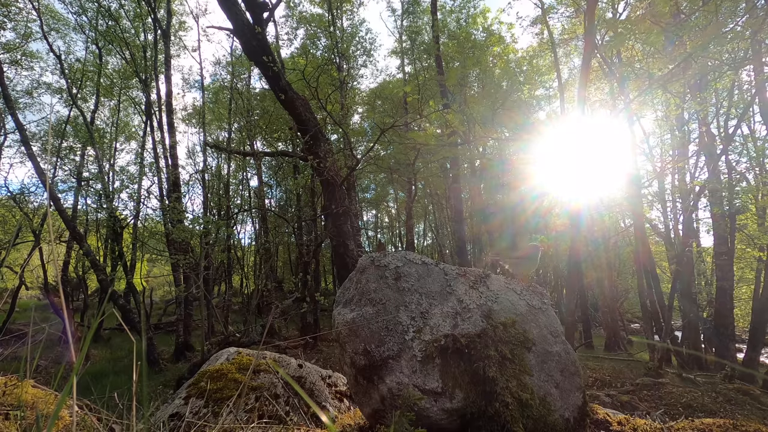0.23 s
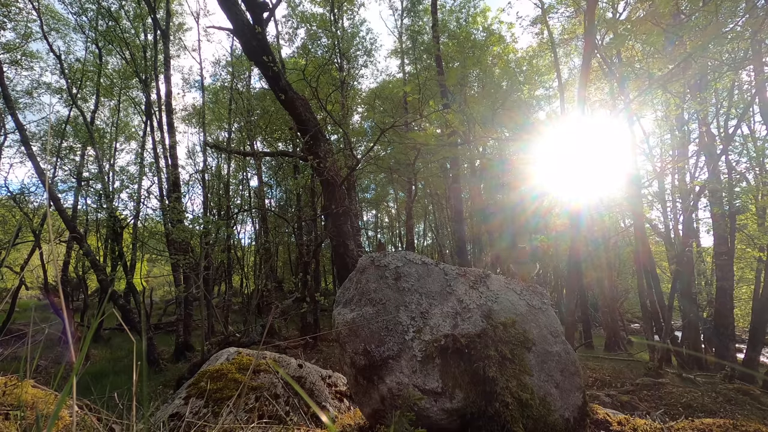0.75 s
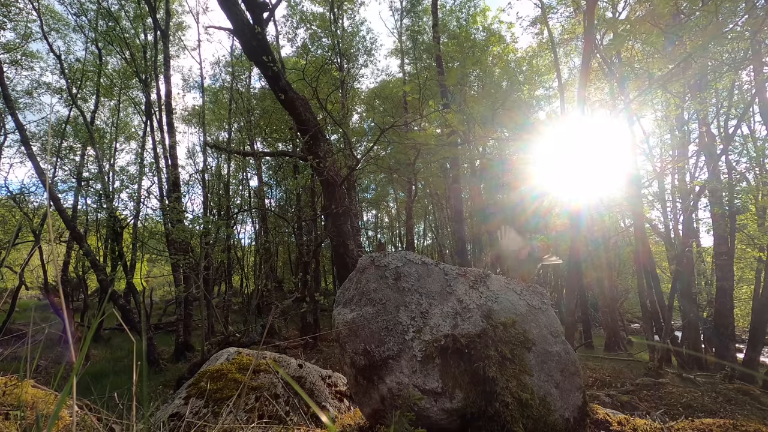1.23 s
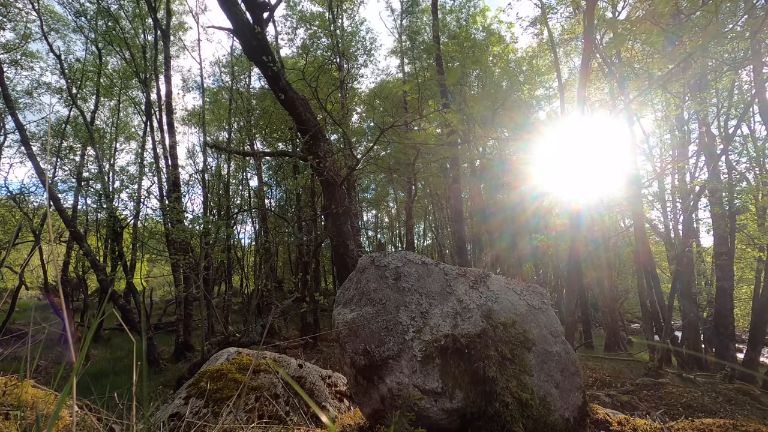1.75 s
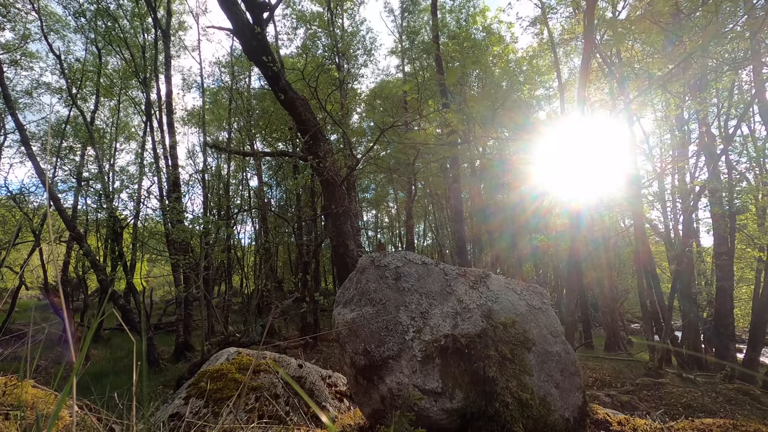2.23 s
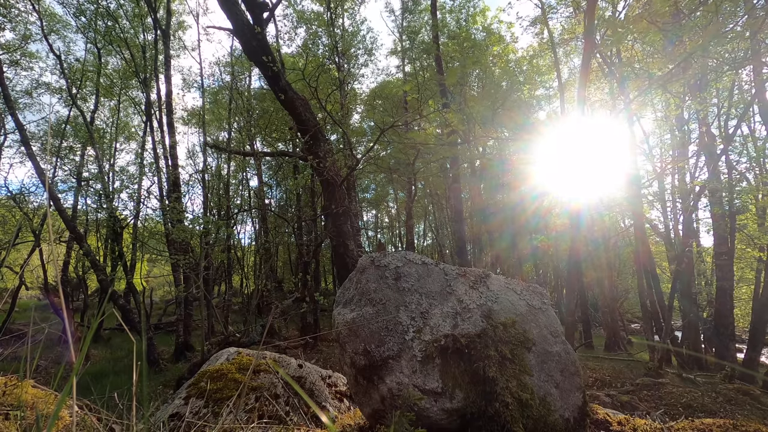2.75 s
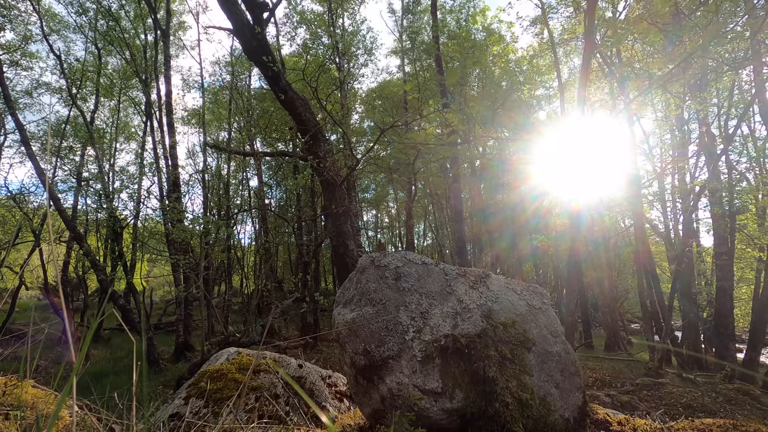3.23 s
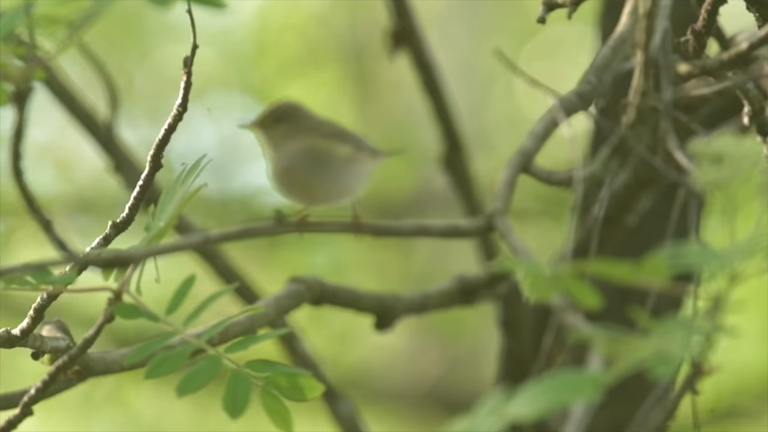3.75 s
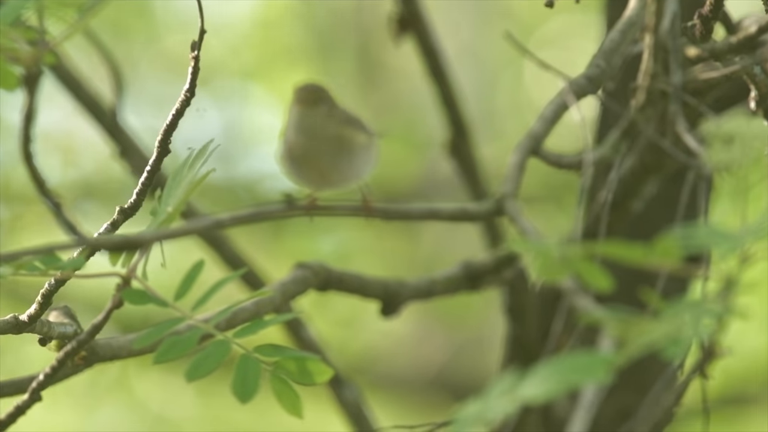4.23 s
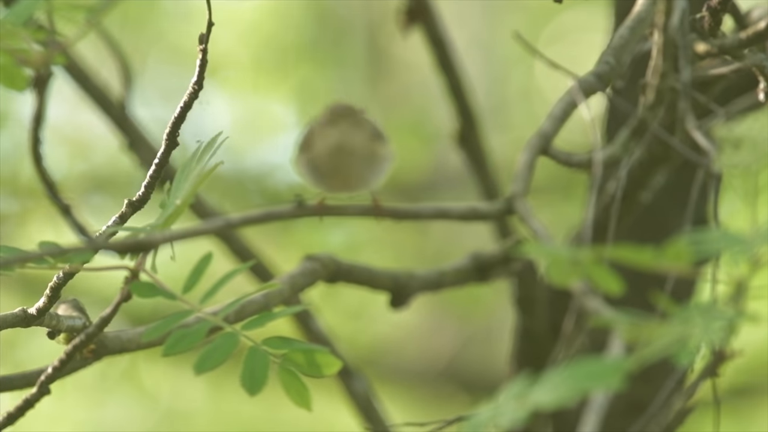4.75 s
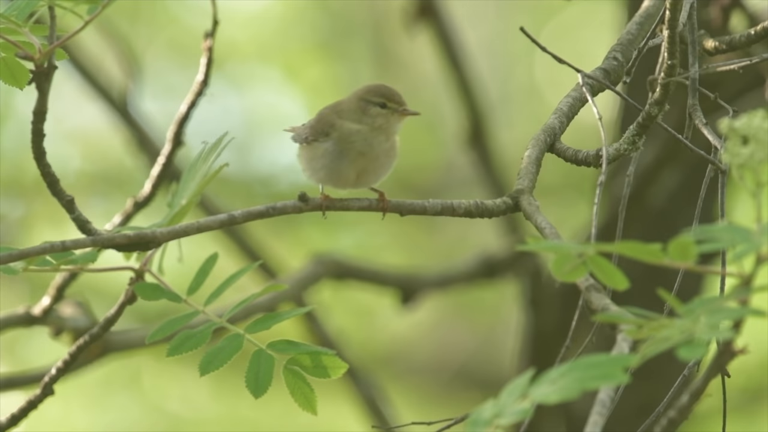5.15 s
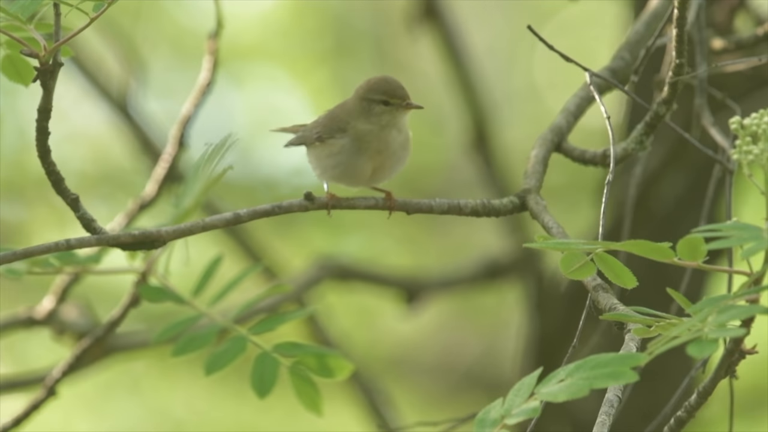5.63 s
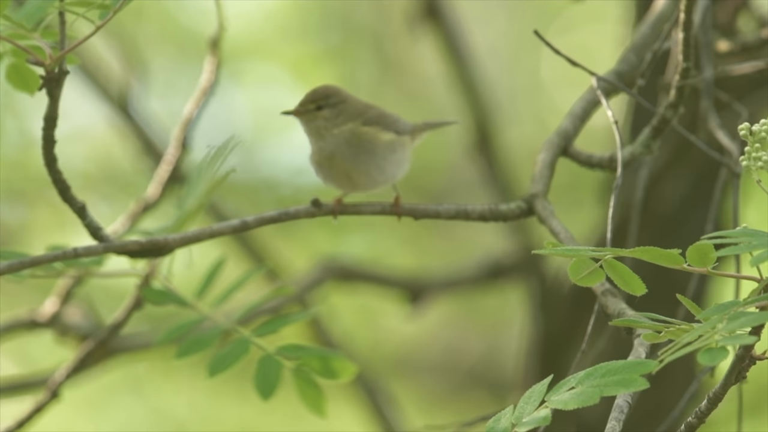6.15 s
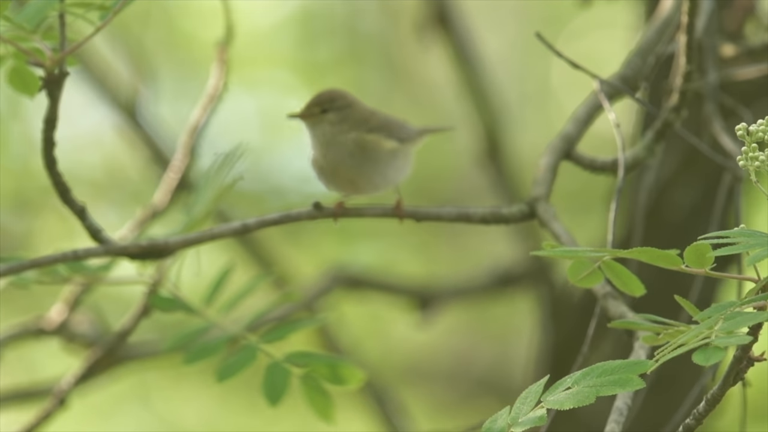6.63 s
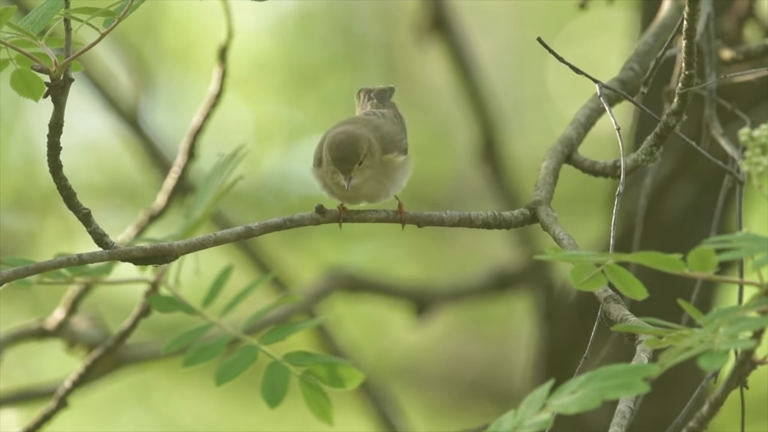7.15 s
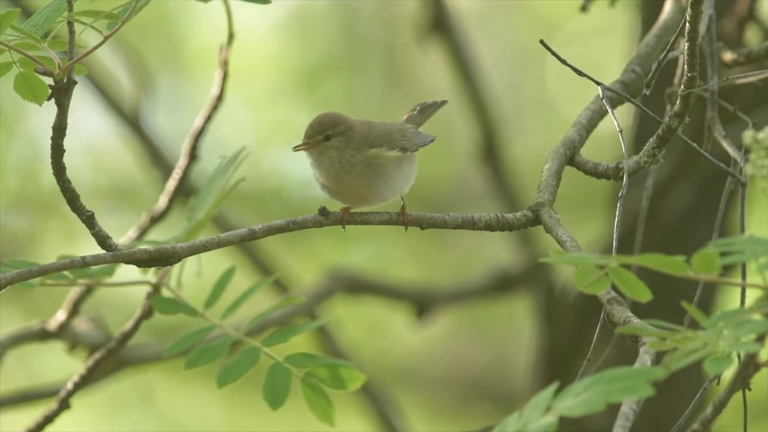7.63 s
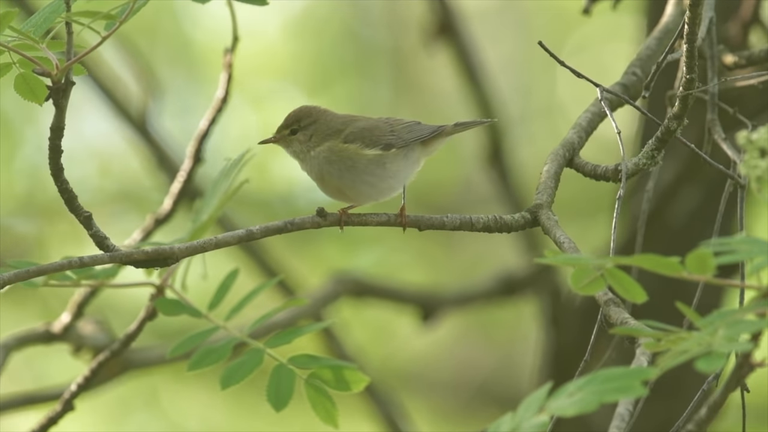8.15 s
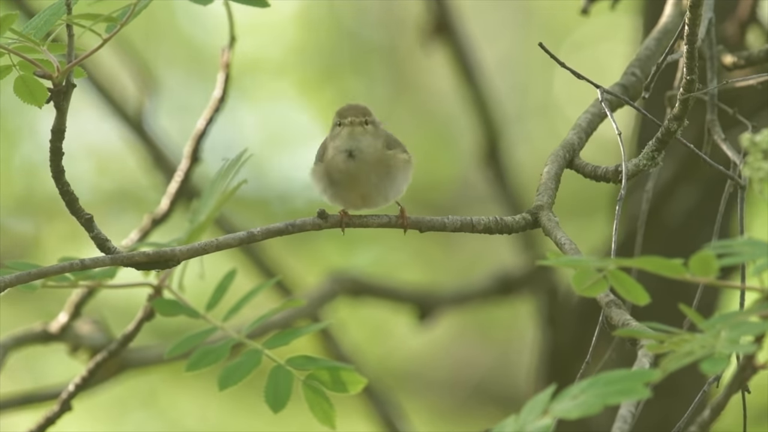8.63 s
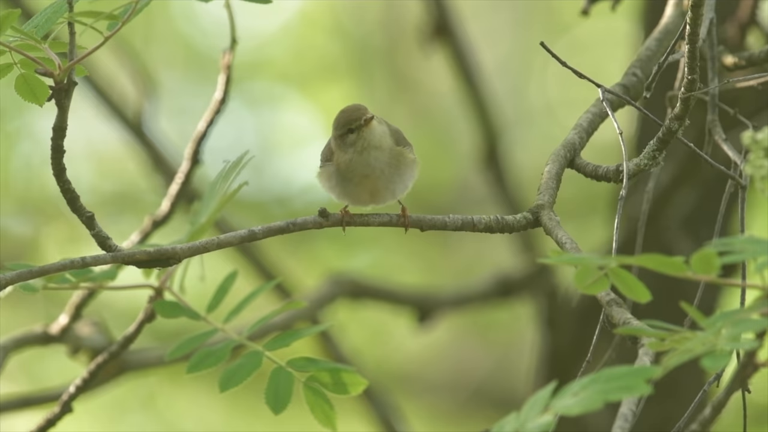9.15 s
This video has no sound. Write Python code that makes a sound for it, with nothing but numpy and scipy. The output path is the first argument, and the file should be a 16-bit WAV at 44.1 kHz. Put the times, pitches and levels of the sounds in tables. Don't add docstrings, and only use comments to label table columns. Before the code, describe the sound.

Quiet open woodland with birds at several distances. Close, nearly central whistles open the scene, overlapped by two rough, faint crow caws on the left. High chips and echoing whistles fill the middle, followed by a left-hand trill that slows and sinks, then a distant phrase of quick peaks. The close songbird resumes with repeated bright notes getting stronger. A low, steady wash and barely felt deep thumps lie beneath.

```python
import sys
import numpy as np
from scipy import signal
from scipy.fft import irfft
from scipy.io import wavfile
from scipy.ndimage import uniform_filter1d

SR = 44100
rng = np.random.default_rng(int(sys.argv[2]) if len(sys.argv) > 2 else 0)


def waveform_to_disk(signal):
    frames = np.transpose(np.atleast_2d(signal))
    scaled = np.clip(frames, -1, 1) * 32767
    samples = np.round(scaled).astype(np.int16)
    wavfile.write(sys.argv[1], SR, samples)


def level_to_linear(level):
    exponent = np.asarray(level, float) / 20
    return 10 ** exponent


N = 413658


def evened(x):
    return x / np.sqrt(np.mean(x ** 2) + 1e-20)


def read(points, hz):
    f, value = np.transpose(points)
    return np.interp(np.log(hz + 1), np.log(f + 1), value)


def add(mix, s, sound):
    part = mix[round(s * SR):][:len(sound)]
    part += sound[:len(part)]


def wobble(count, size):
    return evened(uniform_filter1d(rng.standard_normal(count), size=size))


def columns(rows):
    s, *values = np.transpose(rows)
    t = np.arange(s[0], s[-1], 1 / SR)
    return [uniform_filter1d(np.interp(t, s, v), size=176, mode="nearest") for v in values]


def noise(spectrum, level_db, same, lean_db):
    hz = np.fft.rfftfreq(N, 1 / SR)
    a, b, c, d = rng.standard_normal((len(hz), 4)).T
    same = np.clip(read(same, hz), -1, 1)
    lean = level_to_linear(read(lean_db, hz) / 2)
    left, other = a + 1j * b, c + 1j * d
    right = same * left + np.sqrt(1 - same ** 2) * other
    z = np.array([left * lean, right / lean])
    return level_to_linear(level_db) * evened(irfft(z * level_to_linear(read(spectrum, hz)), N))


# (frequency [Hz], level [dB per Hz])
WASH_SPECTRUM = [(26, -21), (45, -4), (70, -10.5), (101, -4.5), (160, -10.5), (226, -14.5), (397, -22),
                 (1000, -14.5), (1850, -19), (2670, -22.5), (2950, -23), (3860, -27), (5170, -27.5),
                 (15500, -39.5)]
# (frequency [Hz], likeness [-1 to 1])
WASH_LIKENESS = [(60, 0.77), (130, 0.3), (290, 0.407), (640, 0.48), (1410, 0.852), (3100, 0.603),
                 (6820, 0.536), (15000, 0.015)]
# (frequency [Hz], left minus right [dB])
WASH_LEAN = [(60, 2), (130, -4), (290, 0), (640, -4), (1410, -4.5), (3100, -2), (6820, -1.5), (15000, 0)]


def distant_wash():
    return noise(WASH_SPECTRUM, -49.5, WASH_LIKENESS, WASH_LEAN)


# (frequency [Hz], level [dB per Hz])
RUMBLE_SPECTRUM = [(2, -40), (6, 21), (10, 25), (20, 13.5), (35, -1.5), (60, -49)]


def air_rumble():
    return noise(RUMBLE_SPECTRUM, -49, [(5, 1.0), (60, 0.22)], [(5, 0), (60, 0)])


def far_machine():
    first_s, period_s, half_s = 0.182, 0.22751, 0.015
    out = np.zeros(N)
    puff = signal.windows.hann(round(2 * half_s * SR))
    times = np.arange(first_s, N / SR, period_s)
    for s, (size, late) in zip(times, rng.standard_normal((len(times), 2))):
        add(out, s - half_s + 0.00043 * late, level_to_linear(0.37 * size) * puff)
    bass_limit = signal.butter(2, 11, "high", fs=SR, output="sos")
    return level_to_linear(-33.0) * signal.sosfilt(bass_limit, out)


# (frequency [Hz], fall by 60 dB [s])
WOOD_DECAY = [(1400, 0.85), (3000, 0.3), (5000, 0.65), (8000, 0.97)]


def scatter(start_s, near_db, near_t60):
    taps = np.zeros((2, SR))
    at = np.arange(40, SR - 20, 20) + rng.integers(0, 20, (2, (SR - 41) // 20))
    np.put_along_axis(taps, at, rng.choice([-1., 1.], at.shape), 1)
    hz, t, z = signal.stft(taps, SR, nperseg=256)
    far_tail = level_to_linear(-60 * t / read(WOOD_DECAY, hz)[:, None])
    near_cluster = level_to_linear(near_db - 60 * t / near_t60)
    onset = np.clip(t / start_s, 0, 1)
    tail = signal.istft(z * (far_tail + near_cluster) * onset, SR, nperseg=256)[1]
    return tail / np.linalg.norm(tail[0])


def placed(x, pan_db, direct_db, wet_db, near_db=8):
    echoes = scatter(start_s=0.0028, near_db=near_db, near_t60=0.107)
    wet = signal.fftconvolve(x[None], echoes, axes=1)[:, :N]
    sides = level_to_linear(np.array([[pan_db], [-pan_db]]) / 2)
    return sides * (level_to_linear(direct_db) * x + level_to_linear(wet_db) * wet)


def resonate(x, hz, width):
    turn = np.exp(2j * np.pi * np.cumsum(hz) / SR)
    r = np.exp(-np.pi * width / SR)
    return 2 * (turn * signal.lfilter([1 - r], [1, -r], x / turn)).real


def caw_rows(s, length, level_db, throat_hz):
    attack_s, release_s, ends_db, pulses_per_s = 0.016, 0.054, -10, 60
    end = s + length
    corners = [(s, ends_db), (s + attack_s, 0), (end - release_s, 0), (end, ends_db)]
    return [(t, level_db + db, throat_hz, pulses_per_s) for t, db in corners]


# (time [s], length [s], level [dB], throat [Hz])
CROW_CAWS = [
    (0.331, .29, -55.5, 1464),
    (1.158, .39, -51.5, 1439),
]


def crow():
    out = np.zeros(N)
    for caw in CROW_CAWS:
        rows = caw_rows(*caw)
        level_db, throat_hz, rate = columns(rows)
        rate = rate * (1 + 0.0774 * wobble(len(rate), 800))
        pulses = np.diff(np.floor(np.cumsum(rate) / SR), prepend=0)
        rasp = 0.94 * rng.standard_normal(len(rate))
        ring = resonate(resonate(evened(pulses) + rasp, throat_hz, 150), throat_hz, 250)
        add(out, rows[0][0], level_to_linear(level_db) * evened(ring) * signal.windows.tukey(len(rate), .15))
    return placed(out, pan_db=10.0, direct_db=-2.5, wet_db=-1.5)


def bird(notes, waver, edge_s, flutter_db):
    out = np.zeros(N)
    for rows in notes:
        hz, level_db = columns(rows)
        hz = hz * (1 + waver * wobble(len(hz), 130))
        shape = signal.windows.tukey(len(hz), min(2 * edge_s * SR / len(hz), 1))
        whistle = np.sin(2 * np.pi * np.cumsum(hz) / SR)
        add(out, rows[0][0], np.sqrt(2) * level_to_linear(level_db) * shape * whistle)
    flutter = evened(uniform_filter1d(wobble(N, 130), size=130))
    return out * level_to_linear(flutter_db * flutter)


# (time after its start [s], pitch [Hz], level [dB])
TRILL_SYLLABLE = [
    [(0, 4754, 0), (.01, 4200, -2.5), (.025, 4000, 2), (.035, 3304, -1.5), (.05, 2780, 3)],
    [(.06, 3900, -8), (.075, 4689, 4.5), (.085, 4760, -14)],
]


def trill_notes():
    k = np.arange(13)
    starts = 4.2 + .121 * k + .0007 * k ** 2
    factors = .9 + .33 * np.exp(-k / 6)
    levels_db = -56.5 - 12 * np.exp(-k / 1.43)
    return [[(s + u, hz * factor, db + level_db) for u, hz, db in stroke]
            for s, factor, level_db in zip(starts, factors, levels_db)
            for stroke in TRILL_SYLLABLE]


def trilling_bird():
    song = bird(trill_notes(), waver=0.0156, edge_s=0.0027, flutter_db=2.5)
    return placed(song, pan_db=11.0, direct_db=-4.5, wet_db=-3.5)


# (share of the length [0-1], way from first to second pitch [0-1], level [dB])
WAVE = [(0, 0.04, -6.5), (.06, .42, 2), (.2, .06, 3), (.33, 0.02, -3), (.48, .16, -2), (.62, .45, 3.5),
        (.8, 1, -1), (.89, 1, -4), (1, 0.35, 6.5)]
HOOK = [(0, 0, -4), (.165, .42, 0.5), (.35, 1, -11.5), (.6, .7, -6), (1, .06, -6.5)]
HOLD_DROP = [(0, 0.0084, -8), (.36, -.01, -5.5), (.73, 0, 2), (.83, .35, -2), (1, 0.98, -13)]
PEAK = [(0, .27, -7), (.17, .36, -2), (.35, .43, -6.5), (.475, 0.93, -21.5), (.59, .52, -8), (.67, .24, -4),
        (.84, .06, -8), (1, 0, -10)]
STEP = [(0, 0.042, -8), (.26, .08, -6), (.42, 0.27, -8), (.55, .92, -6.5), (.7, 1, -1.5), (1, 0.95, -18)]
FAR_PEAK = [(0, .42, 0), (.16, .46, 3.5), (.38, 1, -5), (.58, .16, -7), (.72, 0.077, 0), (1, 0, -6.5)]
FAR_STEP = [(0, 0.046, -7), (.3, .07, -1), (.46, 0.97, -2.5), (.6, .95, -6), (1, 0.68, 2)]
SETTLE = [(0, 0.029, -5), (.16, .62, -4), (.38, .92, 0), (.65, .98, -5.5), (1, 1, -9.5)]
SWEEP = [(0, 0.093, -2.5), (.19, .46, 0.5), (.68, .71, -1.5), (1, 0.936, 2)]
DROP = [(0, 0.13, -4.5), (.6, .49, -16), (1, 1, -0.5)]
GLIDE = [(0, 0.053, 1), (.5, .5, -4), (1, 1, -0.5)]


def sung(song):
    return [[(s + u * length, first_hz + way * (second_hz - first_hz), db + level_db)
             for u, way, db in shape]
            for shape, notes in song
            for s, length, first_hz, second_hz, level_db in notes]


# (time
# [s], length [s], first pitch [Hz], second pitch [Hz], level [dB])
FAINT_SONG = [(GLIDE, [(1.565, .025, 3660, 4010, -64.5), (1.665, .045, 6070, 5360, -63),
              (2.0, .06, 7670, 7470, -72), (2.17, 0.11, 7250, 6800, -65), (2.27, 0.062, 6300, 5896, -66),
              (2.84, 0.075, 5580, 5210, -57.5), (2.841, .069, 6470, 6286, -63.5),
              (3.0, 0.108, 5720, 5160, -63), (3.13, .06, 3750, 4084, -64), (3.52, 0.0318, 5360, 5000, -62),
              (3.59, .025, 5250, 4800, -57.5), (4.43, .05, 4150, 4074, -63), (5.9, .09, 3550, 3150, -64),
              (1.805, 0.058, 6650, 6220, -65.5), (3.32, .025, 4020, 3870, -60),
              (4.235, .02, 5300, 5300, -67), (4.385, .02, 5240, 5430, -63.5), (3.87, .03, 5300, 4900, -66),
              (4.1, 0.033, 5400, 4700, -68), (3.5, .03, 4100, 3800, -62)])]


def faint_birds():
    song = bird(sung(FAINT_SONG), waver=0.0073, edge_s=0.005, flutter_db=3.5)
    return placed(song, pan_db=3.0, direct_db=1, wet_db=4.5)


# (time [s], length [s], first pitch [Hz], second pitch [Hz], level [dB])
RIGHT_SONG = [(SETTLE, [(2.15, 0.14, 3750, 3560, -58.5), (2.385, 0.17, 3890, 3450, -56.5),
              (2.63, .26, 3983, 3300, -59.5), (2.9, .26, 3980, 3150, -55), (3.17, 0.24, 3650, 3024, -56),
              (8.15, 0.11, 3743, 3550, -56.5), (8.36, 0.23, 3950, 3400, -57.5),
              (8.62, .22, 3910, 3390, -56.5), (8.915, .17, 3530, 3110, -51), (9.175, 0.18, 3440, 3070, -54),
              (3.64, 0.111, 3300, 3140, -63)])]


def right_bird():
    song = bird(sung(RIGHT_SONG), waver=0.0031, edge_s=0.0067, flutter_db=2.5)
    return placed(song, pan_db=-3.0, direct_db=0, wet_db=5, near_db=-2)


# (time [s], length [s], first pitch [Hz], second pitch [Hz], level [dB])
LEFT_SONG = [(GLIDE, [(6.74, .032, 5550, 6650, -54.5), (6.79, 0.088, 7250, 5750, -65),
             (6.885, 0.03, 5210, 5270, -62)]), (SWEEP, [(6.93, 0.027, 5700, 4400, -62)]),
             (FAR_PEAK, [(7.055, 0.072, 4630, 6930, -59.5), (7.23, 0.068, 4670, 6850, -59.5)]),
             (FAR_STEP, [(7.395, 0.08, 3590, 4920, -56), (7.555, .09, 3560, 4880, -56)]),
             (DROP, [(7.71, 0.047, 3610, 4380, -50.5)]), (SWEEP, [(7.752, .065, 4350, 3350, -62.5)])]


def left_bird():
    song = bird(sung(LEFT_SONG), waver=0.0048, edge_s=0.00345, flutter_db=2.5)
    return placed(song, pan_db=7.5, direct_db=0.2, wet_db=1.5, near_db=10)


# (time [s], length [s], first pitch [Hz], second pitch [Hz], level [dB])
MIDDLE_SONG = [(HOOK, [(5.745, 0.12, 5620, 7170, -57)]), (SWEEP, [(1.907, 0.087, 6740, 4120, -55.5),
               (2.066, 0.09, 6910, 4050, -56)]), (DROP, [(1.57, .035, 4800, 5320, -59),
               (1.765, 0.036, 4150, 4950, -51.5), (1.791, .018, 4900, 6650, -50),
               (2.605, 0.0446, 8000, 6850, -55.5), (2.7, 0.047, 7640, 6740, -56),
               (2.75, 0.01703, 5600, 5140, -52), (3.16, .055, 7350, 6760, -56.5),
               (3.28, .06, 7200, 5203, -53), (3.281, .019, 6050, 5900, -54), (3.4, .04, 5950, 5040, -52),
               (3.455, 0.017, 5230, 4747, -50), (3.73, 0.016, 5280, 5120, -54),
               (4.03, .02, 5360, 5240, -63)])]


def middle_bird():
    song = bird(sung(MIDDLE_SONG), waver=0.0062, edge_s=0.0015, flutter_db=2)
    return placed(song, pan_db=2.5, direct_db=0.5, wet_db=4.5)


# (time [s], length [s], first pitch [Hz], second pitch [Hz], level [dB])
WARBLER_SONG = [(GLIDE, [(0.0, 0.0346, 4780, 4920, -51), (8.243, 0.039, 6023, 5634, -52)]),
                (WAVE, [(.328, .145, 2440, 3740, -42.5), (.53, 0.14, 2456, 3574, -41)]),
                (HOOK, [(8.03, 0.15, 5500, 7210, -50.5)]), (HOLD_DROP, [(8.268, 0.077, 5540, 3820, -49),
                (8.405, .099, 5540, 3760, -43), (8.57, 0.1, 5460, 3950, -42)]),
                (PEAK, [(8.73, .095, 4120, 6886, -36), (8.888, 0.094, 4110, 6850, -36)]),
                (STEP, [(9.053, 0.11, 3650, 4668, -35), (9.222, 0.11, 3570, 4630, -33)])]
# (time [s], pitch [Hz], level [dB])
WARBLER_SINGLES = [
    [(0.008, 2220, -52), (0.015, 2818, -43.5), (0.035, 3280, -37), (0.06, 4290, -38), (0.08, 4540, -46.5),
     (0.105, 4540, -44)],
    [(1.133, 2260, -54), (1.148, 2700, -41.5), (1.2, 2866, -50), (1.25, 3014, -45.5), (1.29, 3450, -47),
     (1.31, 3600, -53)],
    [(0.16, 3300, -50), (0.18, 3330, -39.5), (0.203, 3770, -35), (0.23, 3513, -41.5), (0.275, 2710, -39.5)],
    [(0.74, 2910, -41), (0.78, 2490, -40), (0.8, 2710, -44.5), (0.825, 3147, -40.5), (0.845, 3218, -43),
     (0.87, 2890, -38.5), (0.895, 2620, -52)],
    [(0.96, 2130, -55), (0.98, 2610, -40.5), (1.01, 2870, -42), (1.04, 2930, -42), (1.06, 2800, -41),
     (1.08, 2430, -58)],
    [(1.38, 3330, -40), (1.4, 2640, -42), (1.415, 2270, -52), (1.44, 2072, -51), (1.5, 2040, -59)],
]


def warbler():
    notes = sung(WARBLER_SONG) + WARBLER_SINGLES
    song = bird(notes, waver=0.0041, edge_s=0.00256, flutter_db=1.06)
    return placed(song, pan_db=0.5, direct_db=-1, wet_db=-2.0, near_db=6.5)


def scene():
    background = distant_wash() + air_rumble() + far_machine()
    far_birds = crow() + trilling_bird() + faint_birds() + right_bird() + left_bird() + middle_bird()
    return background + far_birds + warbler()


def top_cut(x):
    return signal.sosfilt(signal.butter(12, 15690, fs=SR, output="sos"), x)


def record(dry):
    return top_cut(dry)


dry = scene()
out = record(dry)
waveform_to_disk(out)
```